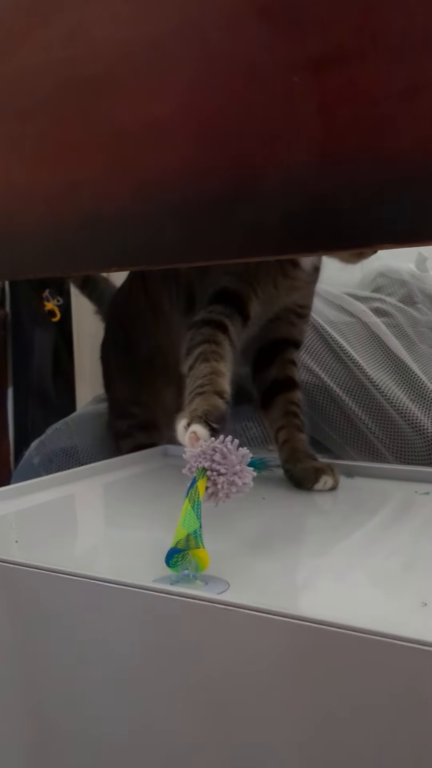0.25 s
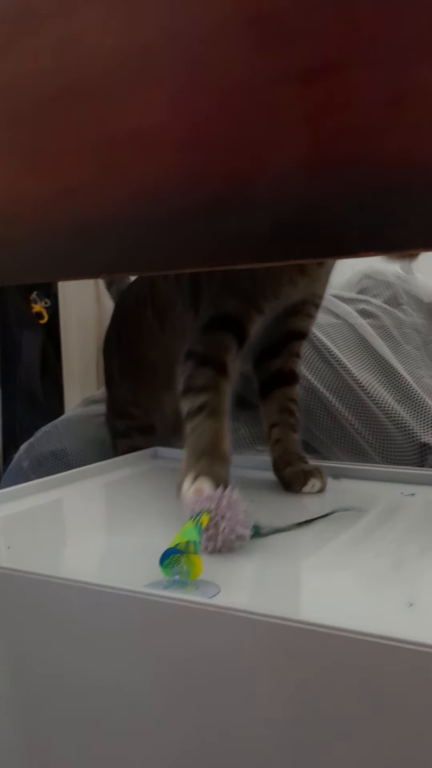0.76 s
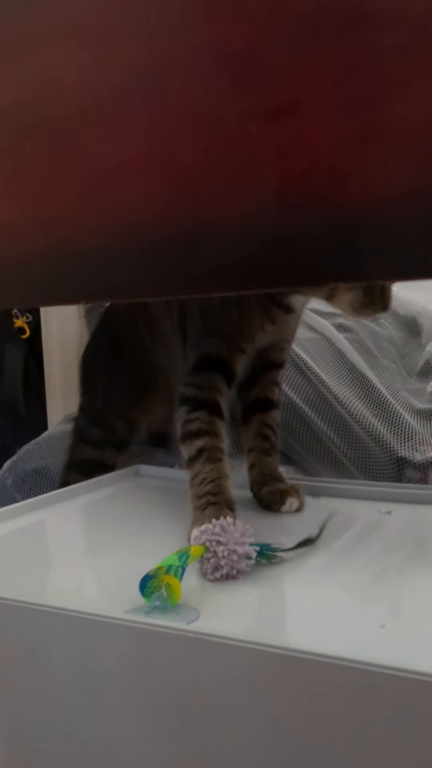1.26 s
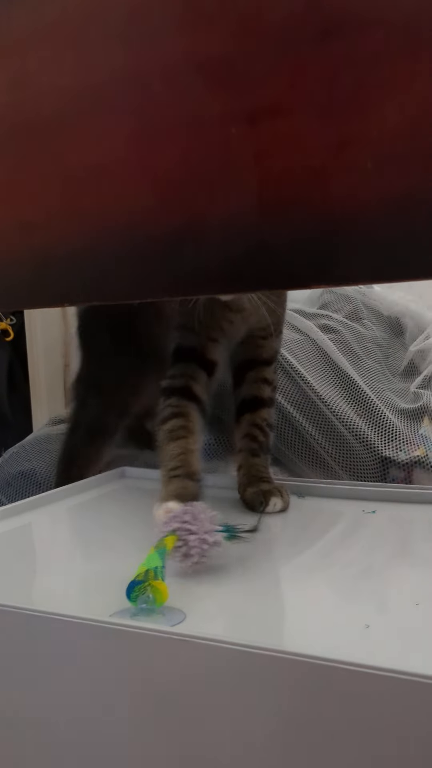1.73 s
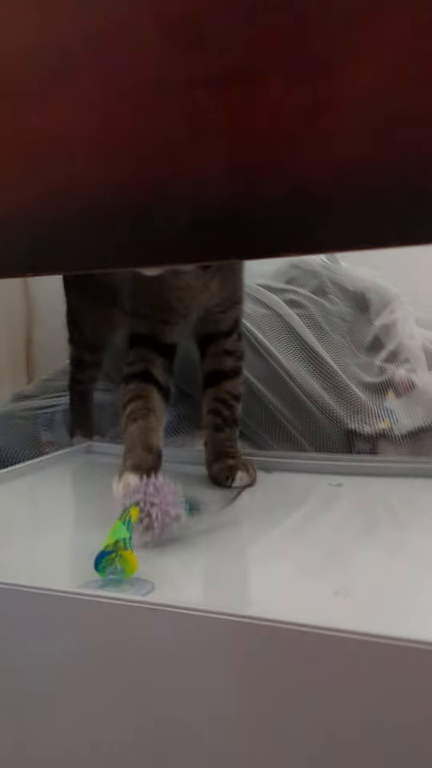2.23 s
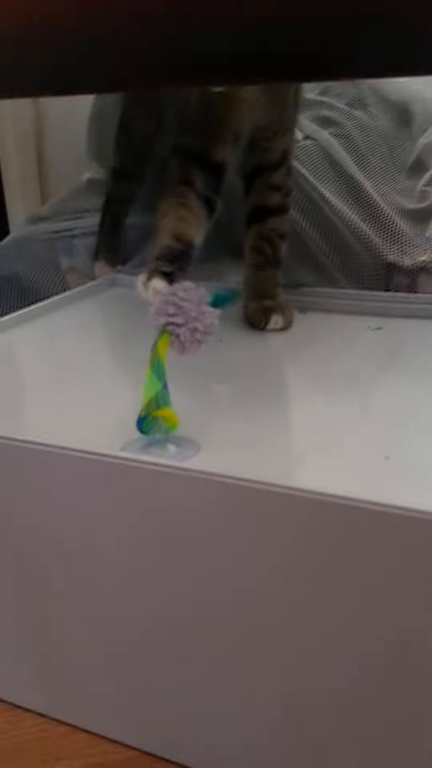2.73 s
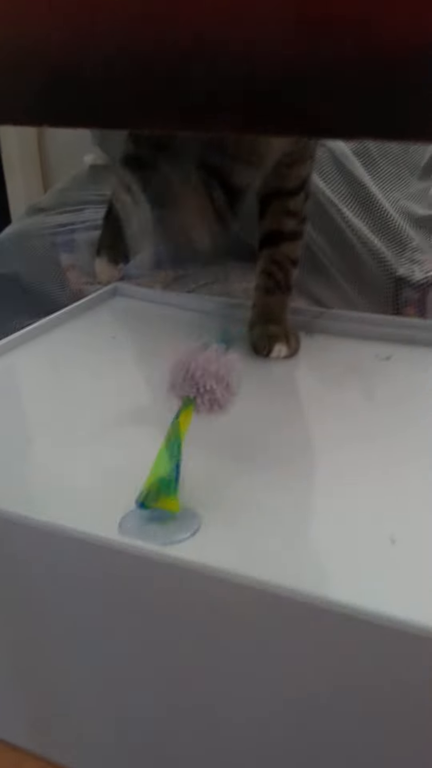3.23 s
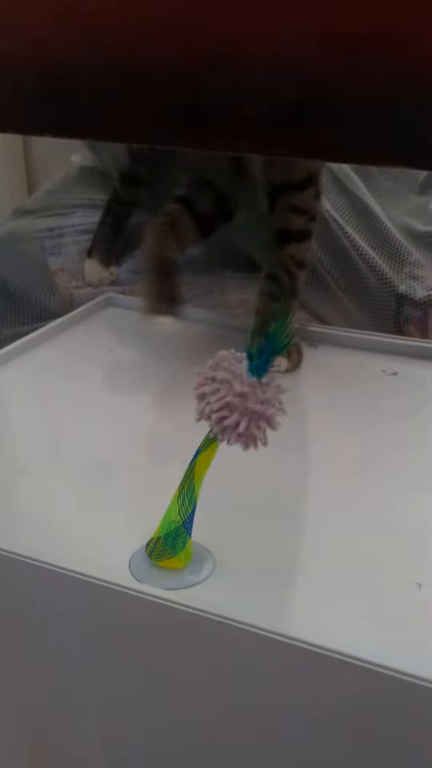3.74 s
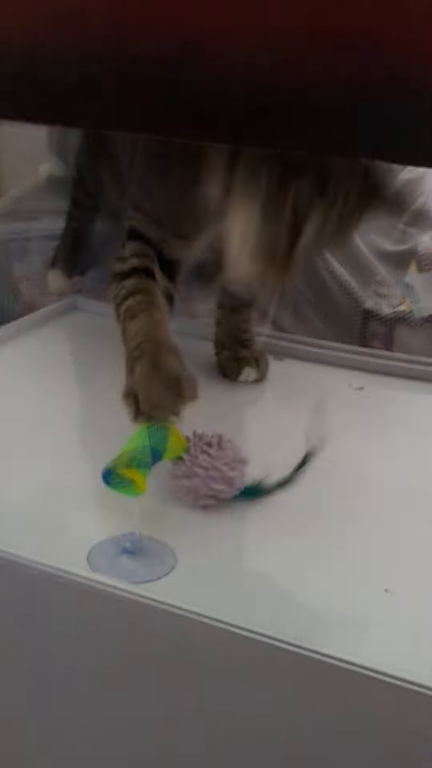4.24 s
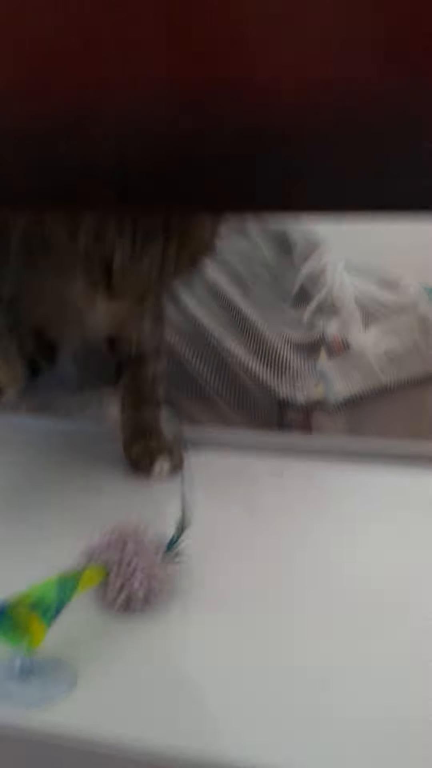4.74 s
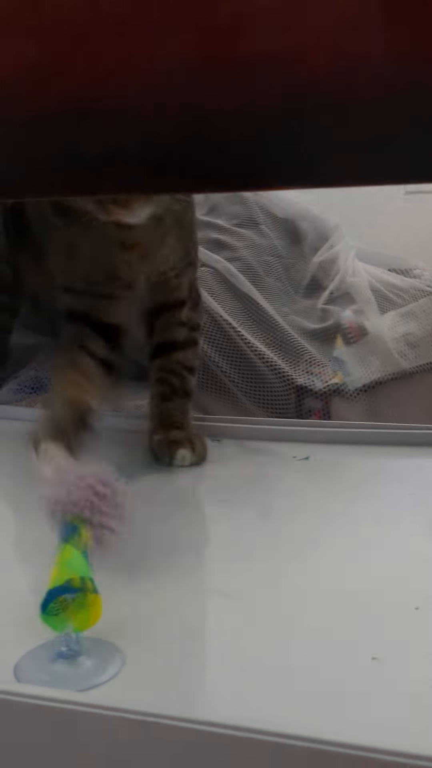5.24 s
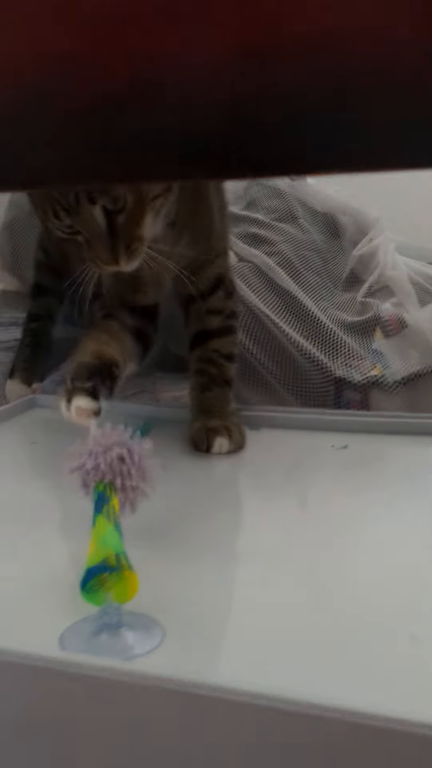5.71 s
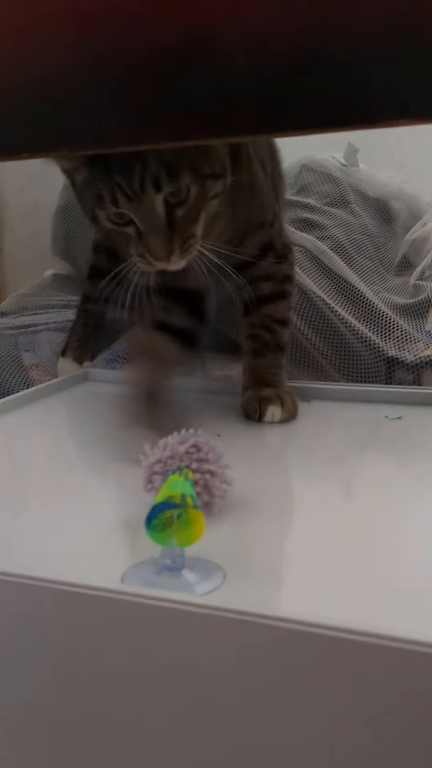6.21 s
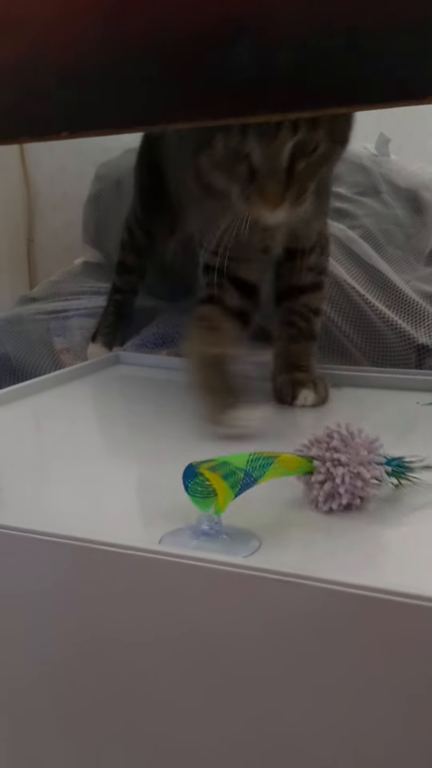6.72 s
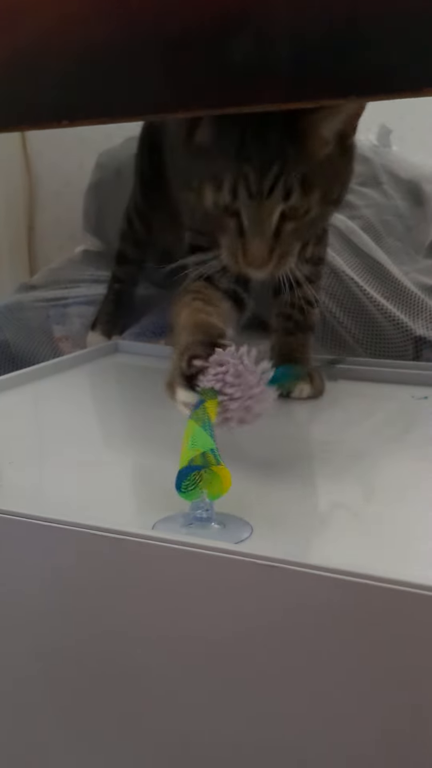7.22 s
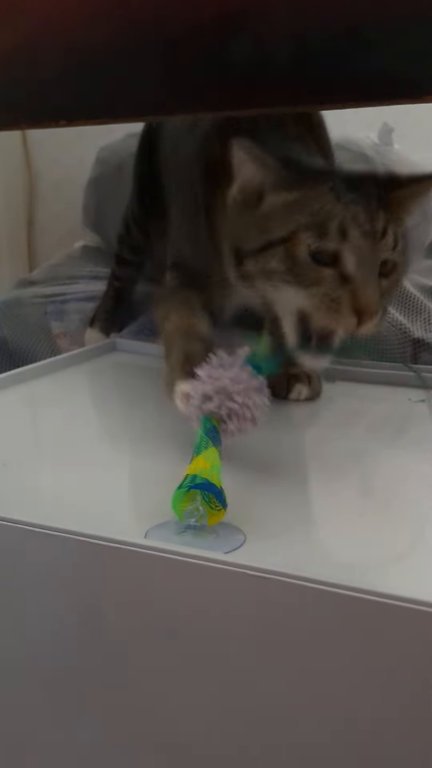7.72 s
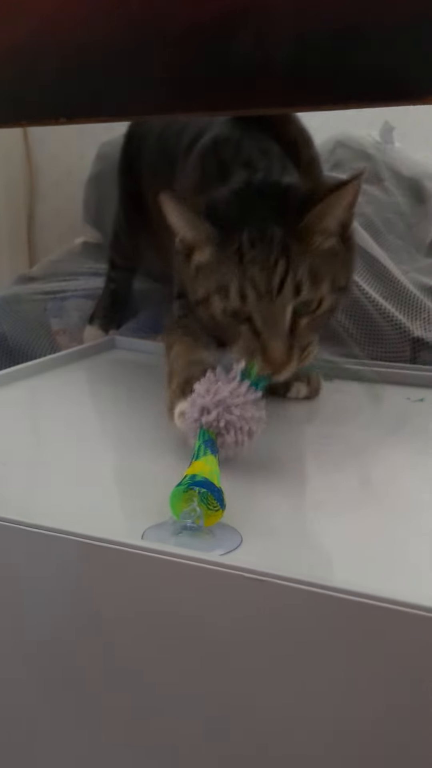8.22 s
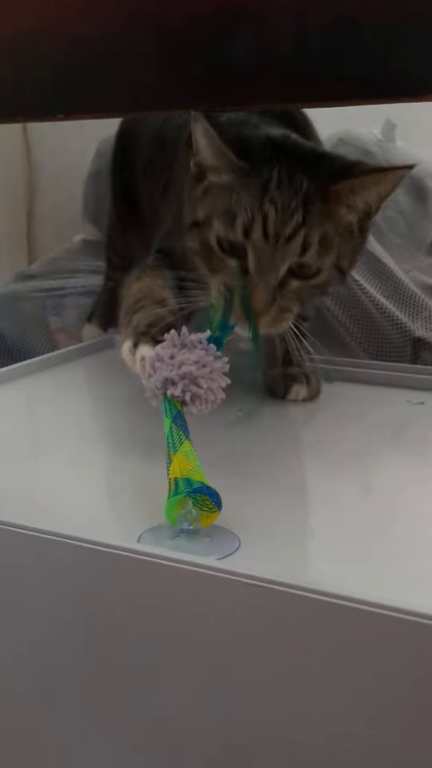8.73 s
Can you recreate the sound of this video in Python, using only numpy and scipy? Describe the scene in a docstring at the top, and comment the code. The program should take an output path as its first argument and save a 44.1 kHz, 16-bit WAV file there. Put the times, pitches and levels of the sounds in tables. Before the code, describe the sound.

Soft creaks and springy snaps, then a sharp loud plastic bang and several boomy thuds as a cat swats a toy in a humming room.

```python
"""A small humming room, heard at the two microphone ports of a phone, with a plastic storage box on the floor.
A cat bats a spring toy that stands by a suction cup on the box lid: noise clicks and ringing modes for toy and claws.
Heavy blows make the box boom through its low modes, and filtered noise bursts creak softly from the floor.
Right at the ports, fingers tick and slide as filtered noise, the hand jolts the phone with low modes,
and the lens drive whines faintly as an unsteady sine. Short faint noise bursts rustle in between."""
import sys
import numpy as np
from scipy import signal
from scipy.fft import rfft, irfft
from scipy.io import wavfile
from scipy.ndimage import uniform_filter1d, map_coordinates

SR = 44100
rng = np.random.default_rng(int(sys.argv[2]) if len(sys.argv) > 2 else 0)


def persist_wave(psi):
    """Save psi, clipped to +-1, as 16-bit WAV."""
    counts = np.round(np.clip(psi, -1, 1) * 32767).astype(np.int16)
    wavfile.write(sys.argv[1], SR, np.atleast_2d(counts).T)


N = 395136  # samples
T = np.arange(SR // 2) / SR  # half a second of time for each struck sound, s
EDGE_HZ = 16200  # upper band limit


def gain_of(db):
    """Decibels to amplitude gain."""
    return 10 ** (np.asarray(db) / 20)


def evened(x):
    """Scales to rms 1."""
    return x / np.sqrt(np.mean(x ** 2) + 1e-20)


def read(points, hz):
    """Reads a table along log frequency."""
    f, value = np.transpose(points)
    return np.interp(np.log(hz + 1), np.log(f + 1), value)


def tilted(colour, db_per_octave):
    """Leans a colour table towards treble (positive) or bass (negative)."""
    return [(hz, level + db_per_octave * np.log2(hz)) for hz, level in colour]


def add(mix, start_s, sound):
    """Mixes a stereo sound in at its start time, cut off at the end of the mix."""
    part = mix[:, max(round(start_s * SR), 0):][:, :sound.shape[-1]]
    part += sound[..., :part.shape[1]]


def sides(pan_db):
    """Left and right gains for a level difference, positive to the left, at constant power."""
    pair = np.array([gain_of(pan_db / 2), gain_of(-pan_db / 2)]).reshape(2, -1)
    return pair / np.sqrt((pair ** 2).mean(0))


# How alike diffuse sound is at the two ports: (freq_hz, correlation)
PORT_LIKENESS = [(30, .88), (70, 1), (130, .99), (300, 0.54), (600, 0.51), (1200, 0.27), (4000, 0.083),
                 (15000, 0.053)]


def noise(colour, size):
    """Stereo noise of a given colour and rms 1, alike at both ports mostly in the bass."""
    hz = np.fft.rfftfreq(size, 1 / SR)
    left, other = rfft(rng.standard_normal((2, size)))
    alike = np.clip(read(PORT_LIKENESS, hz), -1, 1)
    right = alike * left + np.sqrt(1 - alike ** 2) * other
    return evened(irfft(np.array([left, right]) * gain_of(read(colour, hz)), size))


def tint(x, colour, level_db=None, size=4096):
    """Minimum-phase filter; with a level, a white click of energy 1 gets that rms over 50 ms."""
    db = read(colour, abs(np.fft.fftfreq(size, 1 / SR)))
    log_spectrum = np.conj(signal.hilbert(db * np.log(10) / 20))
    taps = np.fft.ifft(np.exp(log_spectrum)).real[:size // 2]
    if level_db is not None:
        taps *= gain_of(level_db) * np.sqrt(SR / 20) / np.linalg.norm(taps)
    return signal.fftconvolve(x, taps[None], axes=1)


def crack(ring_s, spike=0.86):
    """A spike and a dense, quickly dying rattle of high plastic modes, of energy 1 at each port."""
    x = noise([(20, 0), (20000, 0.0055)], len(T)) * np.exp(-T / ring_s)
    x /= np.linalg.norm(x, axis=1, keepdims=True)
    x[[0, 1], rng.integers(0, 4, 2)] += spike  # the wavefront meets the ports a moment apart
    return x / np.linalg.norm(x, axis=1, keepdims=True)


# Decay of the small room: (freq_hz, t60_s)
ROOM_DECAY = [(150, .24), (330, .19), (500, .17), (700, .21), (1500, .22), (4000, .235), (9000, .205),
              (12000, .185), (16000, .14)]


def room(wet_db, build_s=0.003):
    """Reflections of a small room: noise in which each band dies at its own speed."""
    hz = np.fft.rfftfreq(512, 1 / SR)
    _, t, bands = signal.stft(noise([(20, 0.00084), (20000, 0.0048)], len(T)), SR, nperseg=512)
    decay = gain_of(-60 * t / read(ROOM_DECAY, hz)[:, None])
    tail = signal.istft(bands * decay, SR, nperseg=512)[1][:, :len(T)]
    tail *= 1 - np.exp(-T / build_s)
    return gain_of(wet_db) * tail / np.linalg.norm(tail[0])


def ring(modes, corner_hz, spread=0.5, sustain=1, damping=0.37):
    """Dying modes; the springy contact favours those near its resonance and weakens higher ones."""
    out = np.zeros((2, len(T)))
    for hz, db, t60 in modes:
        # high modes reach the ports out of step
        lag = spread * rng.standard_normal() * min((hz / 600) ** 2, 2) * np.array([[1], [-1]])
        contact = 1 / np.hypot(1 - (hz / corner_hz) ** 2, damping * hz / corner_hz)
        decay = gain_of(db - 60 * T / (t60 * sustain))
        out += contact * decay * np.sin(2 * np.pi * hz * T + lag)
    return out


def grain(size, depth_db, count=130):
    """Uneven grain of a noise: the level wanders every few milliseconds."""
    wander = evened(uniform_filter1d(rng.standard_normal(size), count))
    return evened(gain_of(depth_db * wander))


# Low rumble of the room, relative colour: (freq_hz, level_db per Hz)
RUMBLE_COLOUR = [(20, -30), (37, -23.5), (48, -6.5), (60, 0), (76, -4.5), (88, -9.5), (102, 1.5),
                 (112, -10), (127, 2.5), (145, -1.5), (165, -13), (210, -18), (280, -27.5), (400, -41)]
# Steady motor lines: (pitch_hz, rms level_db)
MOTOR_LINES = [(59, -58), (120, -54), (181, -58), (330, -78)]
# Rush of air, relative colour: (freq_hz, level_db per Hz)
AIR_COLOUR = [(200, -6), (400, 6), (470, -0.5), (530, 5), (665, 1.5), (720, -7.5), (1050, -9.5),
              (1450, -13), (2200, -16), (3500, -15), (6000, -25), (10000, -26.5), (16000, -32.5)]
# Course of the air's level, before its trim: (time_s, level_db)
AIR_LEVEL = [(0, -74), (2.1, -71), (4.4, -66), (6.5, -67.5), (8.96, -75.5)]


def room_hum(rumble_db=-43, air_trim_db=-0.5):
    """Low rumble noise with sine motor lines, and a faint rush of air whose level drifts."""
    t = np.arange(N) / SR
    lines = np.zeros(N)
    for hz, db in MOTOR_LINES:
        lines += gain_of(db) * np.sqrt(2) * np.sin(2 * np.pi * (hz * t + rng.random()))
    rumble = gain_of(rumble_db) * noise(RUMBLE_COLOUR + [(900, -77), (4000, -120)], N)
    air_db = np.interp(t, *np.transpose(AIR_LEVEL)) + air_trim_db
    return rumble + lines + gain_of(air_db) * noise(AIR_COLOUR, N)


# Slips of the creaking floor, levels before the trim: (start_s, level_db)
FLOOR_SLIPS = [(0.284, -53), (0.3575, -40.5), (.381, -46), (.4974, -48.5), (2.6723, -55), (2.7027, -49.5),
               (2.727, -64), (2.8331, -51), (2.864, -50), (2.898, -61), (2.946, -57.5), (2.985, -62.5),
               (3.0444, -52), (3.0937, -51.5), (3.125, -58), (3.7853, -64.5), (3.8146, -63)]
# Dull colour of a slip, before its tilt: (freq_hz, level_db)
SLIP_COLOUR = [(60, -10), (150, 0), (330, 2), (480, -2), (680, 1), (1000, -10), (1900, -12), (3000, -19),
               (4500, -30), (7000, -42), (12000, -55)]
# The slips grow brighter as the weight shifts: (time_s, tilt in dB per octave)
SLIP_TILT = [(.3, -8), (2.7, -2.5)]


def floor_creaks(trim_db=-2):
    """Slips of the floor: dull noise bursts with a room tail."""
    out = np.zeros((2, N))
    for start, db in FLOOR_SLIPS:
        colour = tilted(SLIP_COLOUR, np.interp(start, *np.transpose(SLIP_TILT)))
        slip = crack(ring_s=0.02, spike=0.35) + room(wet_db=-9.5)
        add(out, start, tint(slip, colour, db + trim_db))
    return out


# The hand jolts the phone: (start_s, strength level_db)
HAND_JOLTS = [(0.284, -44), (0.359, -48), (0.785, -25), (0.829, -42)]
# Modes of a jolt: (pitch_hz, level_db, t60_s)
HAND_MODES = [(49, -2.5, 0.26), (89.5, -1, 0.11)]


def jolts():
    """Deep bumps of the hand, softly rising low modes stronger at the left port."""
    out = np.zeros((2, N))
    rise = 1 - np.exp(-T / 0.019)
    for start, db in HAND_JOLTS:
        add(out, start, gain_of(db) * sides(11) * ring(HAND_MODES, corner_hz=300) * rise)
    return out


# Short faint noise bursts, some just before or with a tap on the lid:
# (start_s, length_s, level_db, tilt in dB per octave)
FAINT_BURSTS = [(0.366, 0.089, -72.5, 0), (0.495, 0.088, -78, 3), (0.967, 0.12, -69.5, -2),
                (1.57, 0.04, -77, -0.5), (1.736, 0.035, -75, -0.5), (5.121, 0.023, -63.5, -5.5),
                (6.025, .016, -53, -7), (7.068, 0.061, -76, -3), (7.38, 0.019, -55.5, 4.5),
                (7.671, .21, -71, -5.5)]
# Colour of a burst, before its tilt: (freq_hz, level_db)
BURST_COLOUR = [(500, -3.5), (2000, -6.5), (4000, -1.5), (6500, -14.5), (10000, -8.5), (16000, -15)]


def faint_bursts():
    """Short faint rustles: grainy coloured noise that fades in and out."""
    out = np.zeros((2, N))
    for start, length, db, tilt in FAINT_BURSTS:
        size = int(length * SR)
        swell = signal.windows.tukey(size, 0.6) * grain(size, depth_db=4)
        add(out, start, gain_of(db) * noise(tilted(BURST_COLOUR, tilt), size) * swell)
    return out


# Sharp snaps of spring and socket, levels before the snap trim: (start_s, level_db)
SPRING_SNAPS = [(0.8065, -41.5), (1.2617, -33.5), (1.2665, -42.5)]
# Colour of a snap: (freq_hz, level_db)
SPRING_COLOUR = [(250, -15), (520, 2), (700, -8), (850, 4), (1100, -5), (1450, -11.5), (2300, -15.5),
                 (3200, -6.5), (3750, -4.5), (4700, -2), (6500, -16.5), (9000, -3.5), (10500, -10.5),
                 (13000, -7.5), (16000, -34)]
# Modes of the hollow socket: (pitch_hz, level_db, t60_s)
SOCKET_MODES = [(853, 2, 0.063), (770, -19, 0.28)]


def spring_snaps(snap_trim_db=-8):
    """The bent spring snaps as a click with a room tail, and rings the modes of its hollow socket."""
    out = np.zeros((2, N))
    for start, db in SPRING_SNAPS:
        snap = crack(ring_s=0.0036) + room(wet_db=-5.5)
        add(out, start, tint(snap, SPRING_COLOUR, db + snap_trim_db))
        add(out, start, gain_of(db) * ring(SOCKET_MODES, corner_hz=2000, spread=0.18))
    return out


# Fingers ticking on the phone: (start_s, level_db, centre_hz, left-right pan_db)
FINGER_TICKS = [(1.4203, -48.5, 413, -19), (1.426, -60, 1530, -23), (2.2202, -58, 3220, 18),
                (2.2461, -55.5, 2160, -11), (3.173, -74, 2500, 1), (4.0481, -64.5, 1800, -14.5),
                (4.093, -55, 1290, -11), (4.117, -51, 4530, -10)]


def finger_ticks(below_db=-5, above_db=-8.5):
    """Dry clicks right at the ports, falling off per octave on either side of a centre."""
    out = np.zeros((2, N))
    for start, db, hz, pan_db in FINGER_TICKS:
        colour = [(30, below_db * np.log2(hz / 30)), (hz, 0), (EDGE_HZ, above_db * np.log2(EDGE_HZ / hz))]
        add(out, start, sides(pan_db) * tint(crack(ring_s=0.0019), colour, db))
    return out


# Rub colour at each port, with its own resonance before the glide: (freq_hz, level_db)
RUB_LEFT = [(300, -34), (1000, -21), (1800, -12), (2400, -7), (2900, 0), (3600, -4.5), (4700, -14.5),
            (6200, -24.5), (9000, -36), (16000, -34)]
RUB_RIGHT = [(300, -5), (900, -8.5), (1700, 6.5), (2500, 8), (4000, 1), (6000, -13), (9000, -17),
             (16000, -33)]
# Colour of the fizz over the rub: (freq_hz, level_db)
FIZZ_COLOUR = [(2000, -3), (5500, -5.5), (7500, -6.5), (10000, 2), (12500, -1), (15500, -16)]


def slide(length, hardest, press_db, fizz_db, pan_from_db, pan_to_db):
    """A finger lands, presses harder, eases off and lifts, while it travels between the ports."""
    touch_db, lift_db = -11, -11  # pressure at landing and lifting, against the hardest press
    touch_s = 0.015  # time to land or lift
    fizz_growth = 1.33  # dB of fizz for each dB of pressure
    glide_oct_per_db = 0.014  # the resonance rises as the finger closes in on the left port
    size = int(length * SR)
    way = np.linspace(0, 1, size)
    ease_db = np.interp(way, [0, np.clip(hardest, 0.05, 0.95), 1], [touch_db, 0, lift_db])
    pan_db = pan_from_db + (pan_to_db - pan_from_db) * way
    place = np.cumsum(2 ** (glide_oct_per_db * np.maximum(pan_db, 0)))
    ports = [noise(RUB_LEFT, len(T))[0], noise(RUB_RIGHT, len(T))[1]]
    rub = np.array([map_coordinates(port, [place], order=3, mode="wrap") for port in ports])
    fizz = gain_of(fizz_db + fizz_growth * ease_db) * noise(FIZZ_COLOUR, size)
    contact = signal.windows.tukey(size, 2 * touch_s / length) * grain(size, depth_db=1.0)
    return (gain_of(press_db + ease_db) * rub + fizz) * contact * sides(pan_db)


# Fingers sliding beside the ports, pressure and fizz before their trims: (start_s, length_s,
# hardest press as a share of the length, pressure_db, fizz_db, pan_db at the start, pan_db at the end)
FINGER_SLIDES = [(2.232, 0.28, 0.5, -56.5, -72, -4.5, 9.5), (2.533, 0.16, 0.37, -65, -74, 8, 9),
                 (2.664, 0.12, 0.46, -65, -76.5, 11, 3.5), (4.041, 0.061, 0.27, -61, -69, -9, -14),
                 (4.078, 0.15, 0.33, -42, -50, -10, -19), (4.149, .13, 0.45, -51, -43.5, -19, -14),
                 (4.236, 0.1, 0.61, -48.5, -52.5, -8, 1), (4.357, 0.092, 0.33, -56.5, -90, -1, -1.5),
                 (4.411, 0.11, .7, -49.5, -82, -0.5, 1), (4.47, 0.18, 0.47, -42.5, -58, -0.5, 0.5)]


def finger_slides(press_trim_db=2, fizz_trim_db=3):
    """Dry rubbing noise of fingers right at the ports, one slide after another."""
    out = np.zeros((2, N))
    for start, length, hardest, press_db, fizz_db, *pans_db in FINGER_SLIDES:
        add(out, start, slide(length, hardest, press_db + press_trim_db, fizz_db + fizz_trim_db, *pans_db))
    return out


# Runs of the lens drive: (start_s, level_db)
LENS_RUNS = [(2.92, -75.5), (3.125, -79), (3.449, -81), (4.335, -80), (4.62, -70), (4.98, -79)]


def lens_drive(pitch_hz=4540, run_s=0.11):
    """Thin whine, a sine and its third harmonic with wandering phase, stronger at the left port."""
    out = np.zeros((2, N))
    size = int(run_s * SR)
    for start, db in LENS_RUNS:
        wander = np.cumsum(0.026 * rng.standard_normal(size))
        phase = 2 * np.pi * pitch_hz * np.arange(size) / SR + wander
        whine = np.sin(phase) + gain_of(-14) * np.sin(3 * phase)
        add(out, start, gain_of(db) * sides(13) * whine * signal.windows.tukey(size, 0.7))
    return out


def three_bands(body_db, clack_db, treble_db):
    """Colour of a click from three registers; a very hard contact barks above the middle and loses its top."""
    hard_db = max(body_db + 30, 0)
    top_db = treble_db - 1.5 * hard_db
    bark_db = (clack_db + treble_db) / 2 + 0.8 * hard_db
    return [(30, body_db - 7), (170, body_db + 21), (370, body_db + 43), (490, body_db + 36),
            (660, body_db + 39.5), (880, body_db + 29), (1050, clack_db + 36), (2600, clack_db + 35),
            (4400, bark_db + 30.5), (6000, treble_db + 27), (10000, treble_db + 29),
            (14000, top_db + 26.5), (16000, top_db + 19)]


# Toy and claws on the lid, relative strength of each register: (start_s, body_db, clack_db, treble_db)
LID_TAPS = [(3.2729, -35, -52, -47), (3.2775, -23.5, -17.5, -19), (3.2891, -23.5, -33.5, -24),
            (4.7013, -48, -56, -44.5), (4.7128, -42, -45, -36.5), (5.2955, -57, -48.5, -49.5),
            (5.313, -56, -58, -51), (5.3698, -58.5, -54, -58.5), (5.4632, -47.5, -53, -52.5),
            (5.53, -60, -66.5, -92), (5.6153, -65, -60.5, -64.5), (5.666, -38, -33.5, -51),
            (5.67, -37, -50, -67), (6.0359, -30.5, -32, -35.5), (6.2812, -47, -52.5, -51),
            (6.5407, -55.5, -55.5, -77), (6.9343, -61, -62.5, -62), (7.3837, -72, -59.5, -67.5),
            (7.3982, -41.5, -53, -62), (8.0974, -64.5, -72, -64)]
# High modes of the plastic sheet, rung by every tap: (pitch_hz, level_db, t60_s)
SHEET_MODES = [(831, -4, .09), (1174, -5, .1), (1373, -3, .1), (1561, 0, .12), (1720, -2, .11),
               (2168, -3, .08), (2298, -2, .08), (2589, -2, .09), (2816, 0, .09), (3118, -1, .1),
               (3400, 0, .1), (4010, -1, .06), (5345, -1, .07)]


def lid_taps(tap_db=-1, flutter_db=-6, sheet_db=-9, wet_db=-3, tail_db=-8.5):
    """Hard contacts click and flutter through the plastic, then ring on in the sheet and the room."""
    out = np.zeros((2, N))
    sheet = ring(SHEET_MODES, corner_hz=20000)
    sheet *= gain_of(sheet_db) / np.linalg.norm(sheet[0])
    for start, body_db, clack_db, treble_db in LID_TAPS:
        flutter = gain_of(flutter_db) * crack(ring_s=0.009, spike=0)
        tail = gain_of(tail_db) * (room(wet_db) + sheet)
        click = crack(ring_s=0.0011) + flutter + tail
        add(out, start, gain_of(tap_db) * tint(click, three_bands(body_db, clack_db, treble_db)))
    return out


# Heavy blows that flex the lid: (start_s, strength level_db,
# contact resonance_hz: low for a soft paw and high for the hard toy, ring time as a factor)
LID_BLOWS = [(3.277, -7.5, 560, 0.92), (4.105, -16.5, 116.7, 1.11), (4.715, -19, 327, 1.03),
             (5.298, -37.5, 300, 1.24), (5.37, -38.5, 303, 0.9), (5.669, -22, 240, 0.73),
             (6.038, -21.5, 254, 1.1), (7.398, -23.5, 432.5, 1.06)]
# Modes of box and lid, before contact and ring factor: (pitch_hz, level_db, t60_s)
BOX_MODES = [(74.5, -18, 0.61), (93.9, -23.5, 0.21), (123.6, -2, 0.38), (150, 4.5, .18), (158, -5.5, 0.16),
             (189.5, -21.5, 0.59), (238, -18, 0.21), (290, -16, 0.19), (338, -20.5, 0.18), (374, -12, 0.1),
             (453, -27, 0.15), (495, -22.5, 0.12), (584, -22, 0.17), (661.6, -14.5, 0.1)]
# The walls return each blow, colour before the contact dulls it: (freq_hz, level_db)
THUD_COLOUR = [(30, -30.5), (120, -4), (300, 3), (450, -5), (640, -3.5), (900, -19), (2000, -34),
               (16000, -60)]


def box_booms(thud_db=-16, swell_cycles=2.5):
    """Heavy blows set the whole box booming in its modes, and the walls return a dull thud."""
    out = np.zeros((2, N))
    for start, db, contact_hz, sustain in LID_BLOWS:
        # the build-up is timed in cycles of the contact resonance
        swell = 1 - np.exp(-T * contact_hz / swell_cycles)
        add(out, start, gain_of(db) * ring(BOX_MODES, contact_hz, sustain=sustain) * swell)
        # duller for a soft contact
        colour = [(hz, level - 10 * np.log10(1 + (hz / contact_hz) ** 2)) for hz, level in THUD_COLOUR]
        add(out, start, tint(room(wet_db=-2, build_s=0.0018), colour, db + thud_db))
    return out


def echoes(x, echo_db=-14, count=8):
    """Nearby walls and furniture return each sound within 13 ms, at other moments to each port."""
    taps = np.zeros((2, SR // 50))
    for side in taps:
        side[rng.integers(SR // 700, SR // 80, count)] = gain_of(echo_db) * rng.choice([-1, 1], count)
    # long waves bend around small surfaces
    taps = signal.sosfilt(signal.butter(2, 900, "high", fs=SR, output="sos"), taps)
    return x + signal.fftconvolve(x, taps, axes=1)[:, :N]


def scene():
    """Everything at the two ports; only the faint bursts, the toy and the box get the early echoes."""
    with_echoes = echoes(faint_bursts() + spring_snaps() + lid_taps() + box_booms())
    at_the_phone = jolts() + finger_ticks() + finger_slides() + lens_drive()
    return room_hum() + floor_creaks() + at_the_phone + with_echoes


def record(dry):
    """Clips at full scale, fades the very ends, then limits the band."""
    limited = np.clip(dry, -1, 1) * signal.windows.tukey(N, 0.001)
    lowpass = signal.firwin(511, EDGE_HZ, window=("kaiser", 9), fs=SR)
    return signal.oaconvolve(limited, lowpass[None], "same")


dry = scene()
out = record(dry)
persist_wave(out)
```